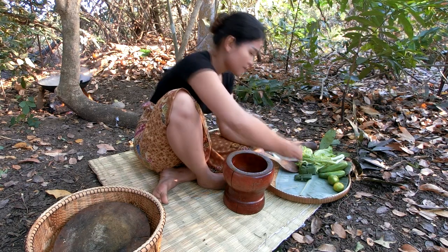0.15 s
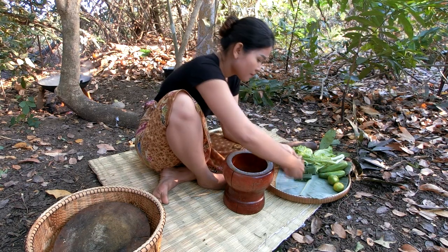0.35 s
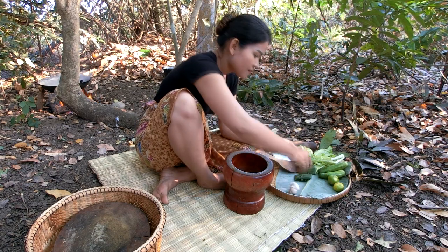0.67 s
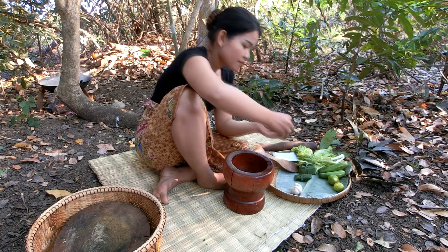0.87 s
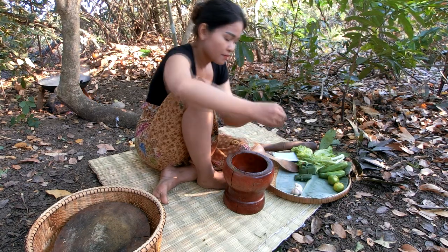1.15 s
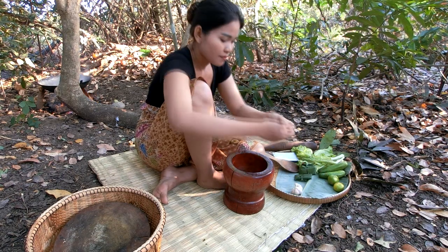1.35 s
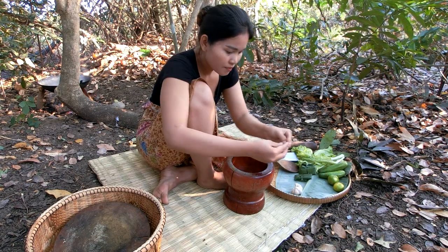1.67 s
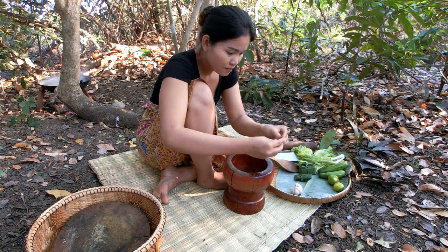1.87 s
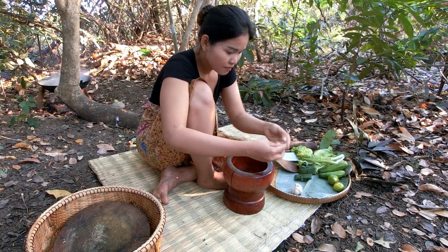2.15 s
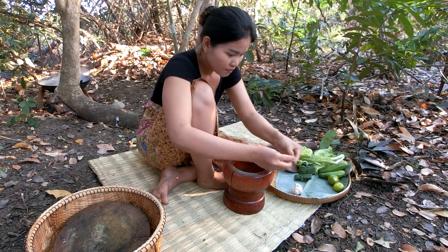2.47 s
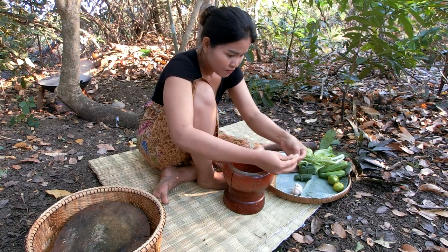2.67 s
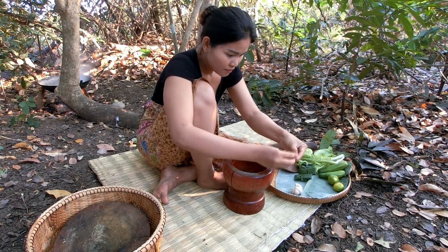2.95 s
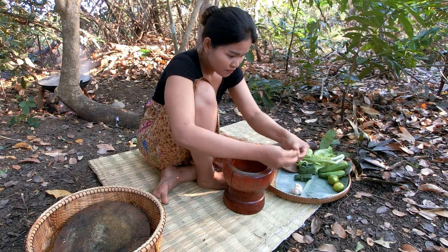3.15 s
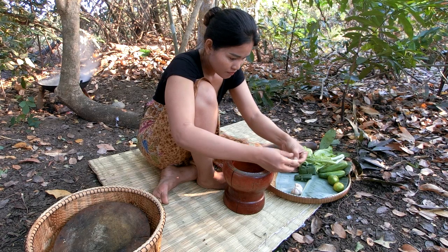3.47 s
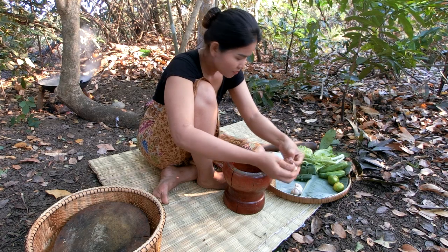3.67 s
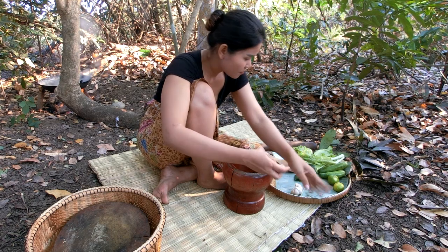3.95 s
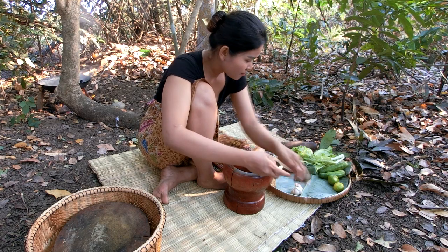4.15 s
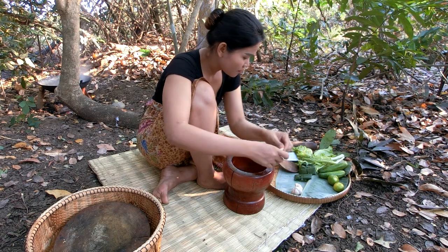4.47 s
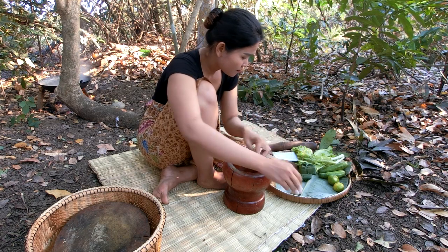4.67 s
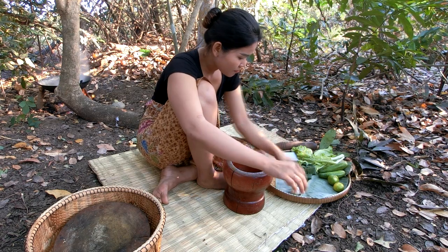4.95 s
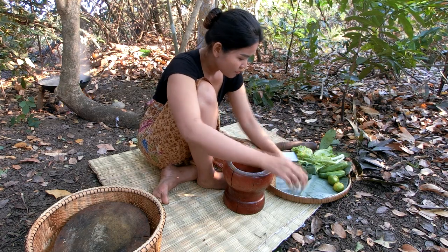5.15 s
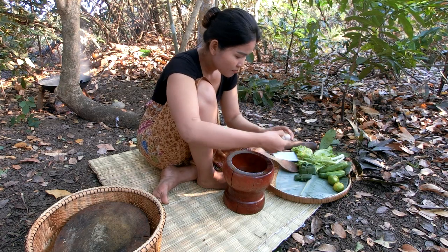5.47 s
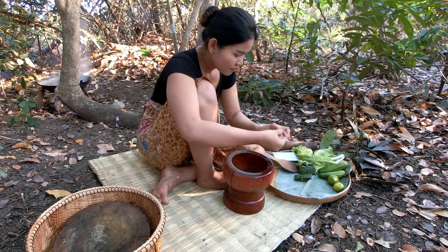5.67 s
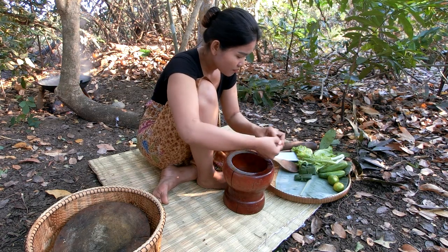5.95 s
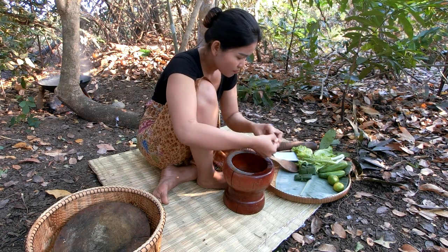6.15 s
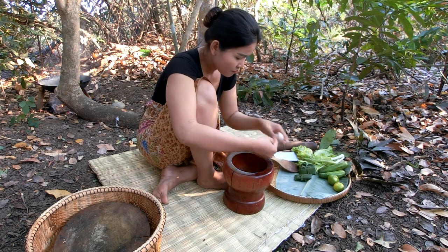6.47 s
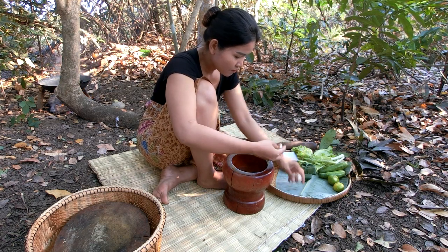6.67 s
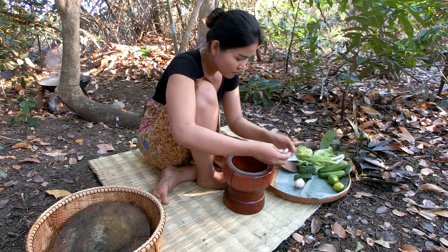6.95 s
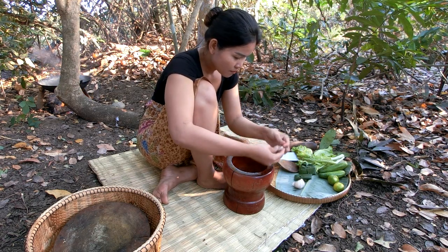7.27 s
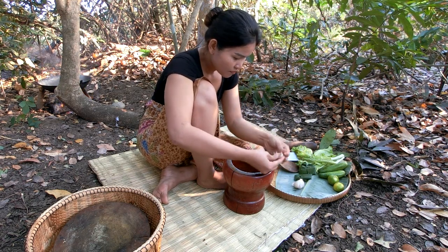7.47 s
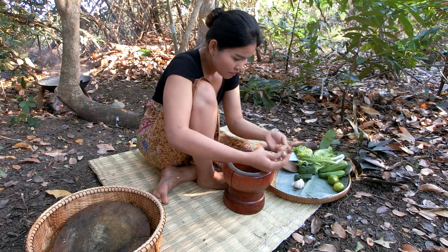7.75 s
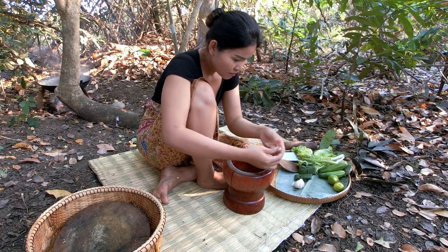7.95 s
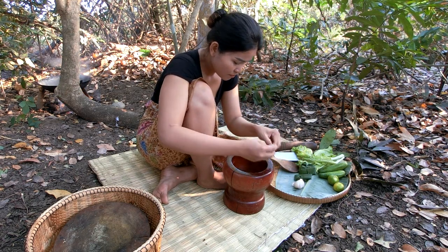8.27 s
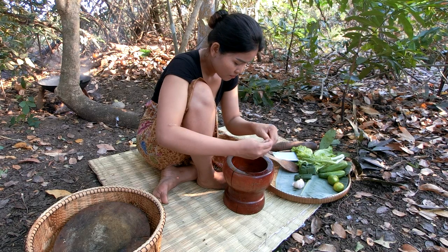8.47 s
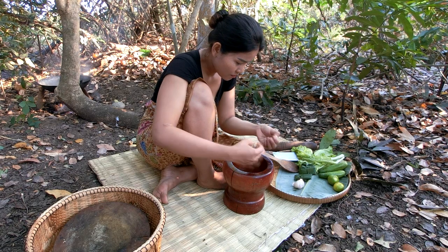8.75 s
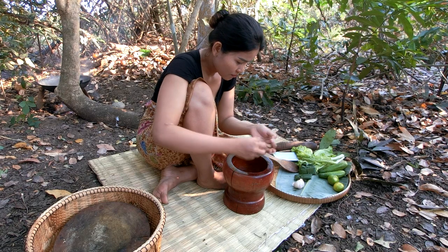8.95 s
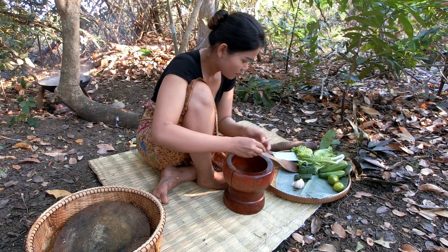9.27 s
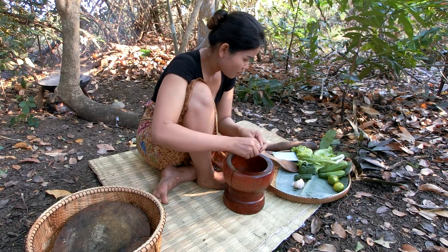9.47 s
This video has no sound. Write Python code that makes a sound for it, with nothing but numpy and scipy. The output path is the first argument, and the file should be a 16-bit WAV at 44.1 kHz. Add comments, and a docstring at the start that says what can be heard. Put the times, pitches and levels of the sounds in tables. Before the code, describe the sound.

A bird whistles falling slurs in bouts at the start, from the middle, and near the end, with quick high triple chips filling between and overlapping. Close up, dry garlic skin snaps and tears in small flurries, the strongest just after six seconds, with a light knife tap early and a few dull clove knocks. Faint far calls, buzzy insects and soft air surround it, with short leafy woodland echoes.

```python
"""Peeling garlic in a dry forest

Close to the microphones, hands peel garlic over a tray: noise bursts snap, grainy runs tear, damped modes of
cloves knock and a knife set down taps. One bird repeats a falling whistle and two more chip in quick threes, all
gliding near-pure tones. Fainter glides call from far off; insects hiss in a narrow noise band. Short rough bursts
near and above 5 kHz, grains ringing one resonance, are a far bird's blurred chips and insect buzzes.
Trunks and dry leaves scatter the sounds back as decaying noise, over a faint rush of air."""
import sys
import numpy as np
from scipy import signal
from scipy.fft import rfft, irfft, next_fast_len
from scipy.io import wavfile
from scipy.ndimage import uniform_filter1d

SR = 44100
rng = np.random.default_rng(int(sys.argv[2]) if len(sys.argv) > 2 else 0)


def persist_wave(psi):
    """Save psi, clipped to +-1, as 16-bit WAV."""
    counts = np.round(np.clip(psi, -1, 1) * 32767).astype(np.int16)
    wavfile.write(sys.argv[1], SR, np.atleast_2d(counts).T)


N = 423801
TIME = np.arange(N) / SR  # seconds

# Colour of dry garlic skin. Each row: frequency in Hz, level in dB.
SKIN_COLOUR = [(300, -25), (1500, -18.5), (3000, -16), (5000, -5.5), (7500, -0.5), (10000, 0), (13000, 0.5),
               (16000, -4.5)]


def undb(db):
    """Decibels to gain."""
    return 10 ** (np.asarray(db) / 20)


def unit(x):
    """Scale to rms 1."""
    return x / np.sqrt(np.mean(x ** 2))


def on_bins(points, size):
    """Read (Hz, value) points at the bins of a transform, along a log frequency axis."""
    hz, value = np.transpose(points)
    bins_hz = np.fft.rfftfreq(size, 1 / SR)
    return np.interp(np.log(bins_hz + 1), np.log(hz), value)


def colour(x, points, size=1024):
    """Causal minimum-phase filter of the given spectrum that keeps the power of white noise."""
    cepstrum = irfft(np.log(undb(on_bins(points, size))))
    # folding the cepstrum onto positive time gives minimum phase
    cepstrum[1:size // 2] *= 2
    cepstrum[size // 2 + 1:] = 0
    response = irfft(np.exp(rfft(cepstrum)))
    response /= np.linalg.norm(response)
    return signal.oaconvolve(x, np.atleast_2d(response))[:, :N]


def walk(rate):
    """Slow random drift of rms 1, from about `rate` fresh values a second, smoothed twice."""
    k = int(SR / rate)
    steps = np.repeat(rng.standard_normal(N // k + 1), k)
    smooth = uniform_filter1d(uniform_filter1d(steps, k), k)
    return unit(smooth[:N])


def add(track, s, sound):
    """Mix a sound into a track from time s."""
    start = max(int(s * SR), 0)
    track[..., start:start + sound.shape[-1]] += sound[..., :N - start]


def beat(start, period, count):
    """Times of an evenly repeated sound."""
    return start + period * np.arange(round(count))


def place(x, left_db, lag_us):
    """A source to the left is louder in the left microphone and reaches the right one later."""
    size = next_fast_len(N)
    delay = np.exp(-2j * np.pi * np.fft.rfftfreq(size, 1 / SR) * lag_us / 10 ** 6)
    late = irfft(rfft(x[-1], size) * delay, size)[:N]
    return np.array([x[0] * undb(left_db / 2), late * undb(-left_db / 2)])


def scatter(x, t60, build_s, left_db):
    """Countless small echoes from leaves and trunks, different at each microphone."""
    t = TIME[:SR]
    decay = undb(-60 * t / t60)
    build = 1 - np.exp(-t / build_s)
    echoes = rng.standard_normal((2, SR)) * decay * build
    echoes /= np.linalg.norm(echoes, axis=1, keepdims=True)
    return signal.oaconvolve(x, echoes, axes=1)[:, :N] * undb([[left_db / 2], [-left_db / 2]])


def note(shape, waver):
    """A bird's near-pure tone along (s, Hz, rms dB) points, its pitch trembling slightly."""
    s, hz, db = shape
    t = np.arange(s[0], s[-1], 1 / SR)
    tremble = unit(uniform_filter1d(rng.standard_normal(len(t)), size=90))
    pitch = np.interp(t, s, hz) * (1 + waver * tremble)
    phase = 2 * np.pi * np.cumsum(pitch) / SR
    return np.sqrt(2) * undb(np.interp(t, s, db)) * np.sin(phase)


def air():
    """Distant rush of the forest: gently swelling noise, more alike at both microphones in the bass."""
    # Colour of the rush. Each row: frequency in Hz, level in dB.
    air_colour = [(15, -21), (25, 4.5), (49, -5), (97, -3.5), (149, -8), (545, -7), (1330, -11), (1560, -8),
                  (2610, -13), (3720, -12.5), (4740, -16), (5880, -15.5), (9320, -13), (14400, -14),
                  (16000, -23)]
    # How alike the two microphones hear it. Each row: frequency in Hz, left-right correlation from 0 to 1.
    air_likeness = [(30, 0.11), (80, 0.74), (250, 0.384), (1000, 0.27), (3000, 0.19), (12000, 0.011)]
    size = next_fast_len(N)
    mid, side = rfft(rng.standard_normal((2, size)))
    likeness = np.clip(on_bins(air_likeness, size), 0, 1)
    opposite = np.array([[1], [-1]])
    pair = mid * np.sqrt(1 + likeness) + opposite * side * np.sqrt(1 - likeness)
    rush = unit(irfft(pair * undb(on_bins(air_colour, size)), size)[:, :N])
    level_db = -59 + 0.5 * walk(2.072)
    return place(rush * undb(level_db), left_db=0.3, lag_us=0)


def insects():
    """Many small singers share one narrow resonance: noises throb out of step in a single band."""
    # Level of the chorus over time. Each row: time in seconds, level in dB before chorus_trim_db.
    chorus_levels = [(0.0, -53), (0.96, -69.5), (1.79, -65.5), (2.27, -65.5), (2.67, -60.5), (4.33, -62),
                     (4.44, -64.5), (5.8, -63), (5.99, -58), (6.52, -65), (7.0, -61), (7.86, -64),
                     (8.26, -59.5), (9.6, -64)]
    # The shared resonance. Each row: frequency in Hz, level in dB.
    insect_band = [(3000, -30.5), (3900, -17), (4350, -2), (4750, 0.5), (5150, -6.5), (5700, -19),
                   (7000, -52)]
    chorus_trim_db = 0.5
    shared, left, right = (rng.standard_normal(N) * undb(3.8 * walk(80)) for _ in range(3))
    chorus = unit(colour(0.75 * shared + np.array([left, right]), insect_band))
    level_db = chorus_trim_db + np.interp(TIME, *np.transpose(chorus_levels))
    return place(chorus * undb(level_db), left_db=2, lag_us=43)


def rough_bursts():
    """A far bird's blurred chips at an even beat, and insect buzzes: random grains ring one resonance."""
    # Short rough bursts near and above 5 kHz. Each row: start in seconds, number of bursts,
    # seconds from burst to burst, resonance in Hz, rms level in dB before the mix of direct sound and echo.
    burst_groups = [(0.484, 2, 0.3, 4945, -59), (0.495, 2, 0.14, 6050, -61.5),
                    (1.127, 6, 0.198, 5140, -54.5), (4.181, 1, 0.081, 6100, -55.5),
                    (4.674, 4, 0.11, 6780, -59), (5.589, 4, .109, 6800, -61), (6.722, 1, 0.086, 6440, -56),
                    (8.349, 1, .13, 5900, -59)]
    duty, grains_per_s = 0.62, 900  # duty: share of each beat that sounds
    song, t = np.zeros((1, N)), TIME[:SR // 100]
    for start, bursts, period, hz, db in burst_groups:
        n = int(duty * period * SR)
        ring = t * np.exp(-t / 0.00037) * np.sin(2 * np.pi * hz * t)
        for s in beat(start, period, count=bursts):
            grains = (rng.random(n) < grains_per_s / SR) * rng.standard_normal(n)
            burst = np.convolve(grains, ring)[:n] * signal.windows.tukey(n, .6)
            add(song, s, unit(burst) * undb(db))
    direct = undb(-12.5) * place(song, left_db=8, lag_us=19)
    return direct + undb(-5) * scatter(song, t60=0.197, build_s=0.001, left_db=3.0)


def far_birds():
    """Faint glides from deep in the trees, swelling and fading, with echo nearly as strong as the call."""
    # The clearer calls. Each row: start in seconds, length in seconds, first pitch in Hz, last pitch in Hz,
    # mid-call level in dB before the mix of direct sound and echo.
    calls = list([(0.951, .06, 2790, 3050, -64), (1.383, .17, 3480, 4060, -63),
                  (2.116, 0.1086, 4150, 3258, -62.5), (2.19, .13, 2820, 2320, -66.5),
                  (2.549, .12, 2960, 2690, -66), (2.911, .11, 1446, 1280, -64),
                  (3.077, 0.21, 1147, 980, -67.5), (3.586, .17, 1016, 951, -67.5),
                  (4.049, 0.13, 4120, 4600, -61), (4.96, 0.085, 2340, 2057, -64.5),
                  (5.356, 0.112, 3260, 3140, -62.5), (6.14, 0.088, 3420, 3680, -57),
                  (6.485, .12, 4030, 3020, -60), (6.834, 0.084, 3320, 3290, -59),
                  (8.333, 0.11, 3455, 3550, -66), (9.167, .08, 3870, 3180, -63.5),
                  (9.468, 0.11, 4378, 3480, -69)])
    # the faintest are short downward slurs, one at a random moment in each gap
    gap_s, length_s, centre_hz, fall_ratio, faint_db = .9, 0.079, 2710, 0.92, -67
    beats = np.arange(0, TIME[-1] - gap_s, gap_s)
    for s, (late, high) in zip(beats, rng.random((len(beats), 2))):
        first_hz = centre_hz * (1 + .15 * high)
        calls.append((s + late * gap_s, length_s, first_hz, first_hz * fall_ratio, faint_db))

    song = np.zeros((1, N))
    u = np.linspace(0, 1, 9)
    fade_db = -16 * np.abs(2 * u - 1) ** 3
    for s, length, first_hz, last_hz, db in calls:
        glide = first_hz + (last_hz - first_hz) * u ** 2.1  # starts level and steepens
        add(song, s, note((u * length, glide, db + fade_db), waver=0.0137))
    direct = undb(-2.0) * place(song, left_db=3.0, lag_us=11)
    return direct + undb(-3.5) * scatter(song, t60=0.38, build_s=.003, left_db=0.5)


def chipper():
    """Two birds' short falling chips at an even beat, blurred by the foliage and washed by the trees."""
    # Bouts of chip runs, the low weak ones from a second bird. Each row: first chip in seconds, number of runs,
    # seconds from run to run, pitch ratio, level in dB before spread and mix.
    chip_bouts = [(.380, 1, .225, 1.01, -45.5), (2.443, 6, .2243, .985, -46), (2.56, 7, .2243, .91, -53),
                  (3.752, 2, .224, 1.005, -44), (4.172, 4, .231, 1.01, -46), (6.72, 4, .2248, .92, -53),
                  (6.833, 6, .2248, 1, -46), (8.117, 4, .234, 1, -46.5)]
    # Shape of one chip. Each row: seconds from its centre, pitch in Hz before ratio and spread,
    # relative level in dB.
    chip_shape = [(-.009, 5560, -21), (-.004, 5266, -7), (0, 5120, -3), (.005, 4876, -2.5),
                  (.011, 4625, -8.5), (0.018, 4357, -13)]
    chip_beat_s, run_pitch_spread, chip_pitch_spread, chip_spread_db = .0368, .012, 0.0088, 0.76
    song = np.zeros((1, N))
    dt, hz, shape_db = np.transpose(chip_shape)
    for start, runs, period, ratio, db in chip_bouts:
        for run_s in beat(start, period, count=runs):
            run_pitch = ratio * (1 + run_pitch_spread * rng.standard_normal())
            for s in beat(run_s, chip_beat_s, count=3):
                wobble, effort = rng.standard_normal(2)
                pitch = hz * run_pitch * (1 + chip_pitch_spread * wobble)
                levels = shape_db + db + chip_spread_db * effort
                add(song, s + dt[0], note((dt, pitch, levels), waver=0.015))
    leaves = undb(-5.5) * scatter(song, t60=0.12, build_s=0.0029, left_db=-1.5)
    # the long way through the trees dulls the top of each chip
    dull = signal.lfilter(*signal.butter(4, 4900, "low", fs=SR), song)
    trees = undb(-0.5) * scatter(dull, t60=0.226, build_s=0.0033, left_db=6.5)
    return undb(-1.5) * place(song, left_db=3.0, lag_us=22) + leaves + trees


def whistler():
    """A slur that holds high, falls fast and levels out; its weight shifts between start and end."""
    # Falling whistles. Each row: time of the bend in seconds, level in dB before the shape, time stretch.
    whistles = [(.048, -44, 0.87), (0.438, -43, 0.91), (.847, -44, 0.9), (1.239, -44.5, 1.06),
                (1.682, -44, 0.96), (3.607, -43, 1.11), (3.985, -40.5, 0.86), (4.342, -42.5, 0.95),
                (4.711, -39.5, 0.98), (5.121, -41, 1.1), (5.495, -41.5, 1.02), (5.895, -37.5, 1.03),
                (7.759, -39, 0.87), (8.135, -37.5, 0.88), (8.484, -39.5, 0.86), (8.92, -42.5, 0.83),
                (9.286, -42.5, .85)]
    # Shape of one slur. Each row: seconds from the bend before stretching, pitch in Hz before a small
    # random bend, relative level in dB before the weighting.
    slur_shape = [(-.054, 4340, -29), (-.044, 4460, -14), (-.036, 4540, -10), (-.023, 4420, -12.5),
                  (-.017, 4140, -5.5), (-.011, 3736, -4.5), (-.001, 3250, -4.5), (.011, 2986, -3.5),
                  (.027, 2900, -5), (.039, 2850, -6), (0.047, 2535, -12.5), (.052, 2200, -22)]
    # a louder whistle leans more on its low end
    low_end_db, usual_db, low_end_per_db = -1.5, -40.5, 0.79
    song = np.zeros((1, N))
    dt, hz, shape_db = np.transpose(slur_shape)
    for s, db, stretch in whistles:
        weight_db = low_end_db + low_end_per_db * (db - usual_db)
        levels = db + shape_db + weight_db * np.clip(dt / 0.02, -1.2, 1)
        pitch = hz * (1 + 0.0046 * rng.standard_normal(len(hz)))  # no two slurs bend quite alike
        add(song, s + dt[0] * stretch, note((dt * stretch, pitch, levels), waver=.006))
    # foliage throws back the high start more than the low end
    bright = signal.lfilter(*signal.butter(2, 3650, "high", fs=SR), song)
    leaves = undb(2.5) * scatter(bright, t60=0.2, build_s=0.00066, left_db=2.5)
    trees = undb(-19) * scatter(song, t60=0.56, build_s=0.016, left_db=-4.0)
    return place(song, left_db=2.8, lag_us=18) + leaves + trees


def tray():
    """Cloves knock dully on the tray and a knife set down taps it: well-damped modes, alike in both microphones."""
    # Dull clove knocks, then light knife taps. Each row: time in seconds, level in dB before the modes.
    knocks, taps = [(4.815, -35.5), (6.338, -46), (7.405, -38.5)], [(.187, -46), (.209, -36), (.219, -31.5)]
    # What each rings with. Each row: frequency in Hz, time to fall 60 dB in seconds, relative level in dB.
    knock_modes, tap_modes = [(194.5, 0.022, -24), (574, 0.018, -17), (667, 0.019, 0), (1150, .0075, -16)], [(2270, 0.012, -2.5), (2370, 0.0333, 0)]
    hits, t = np.zeros((2, N)), TIME[:SR // 10]
    onset = 1 - np.exp(-t / 0.00048)
    for blows, modes in (knocks, knock_modes), (taps, tap_modes):
        ring = np.zeros(len(t))
        for hz, t60, db in modes:
            ring += undb(db) * np.exp(-np.log(1000) * t / t60) * np.sin(2 * np.pi * hz * t)
        for s, db in blows:
            add(hits, s, undb(db) * ring * onset)
    return hits


def fingertips():
    """Faint stray crackles as the fingers work the husk: decaying noise grains in small flurries."""
    chance = 14 * undb(3.4 * walk(3.5)) / SR  # around 14 grains a second
    sizes = undb(3.7 * np.minimum(rng.exponential(size=N), 3)) * rng.choice([-1, 1], N)
    strikes = (rng.random(N) < chance) * sizes
    t = TIME[:SR // 200]
    grain = rng.standard_normal((2, len(t))) * np.exp(-t / 0.00053)
    crackles = signal.oaconvolve([strikes], grain, axes=1)[:, :N]
    ticks = colour(crackles, SKIN_COLOUR) * undb(-56)
    return place(ticks, left_db=6.0, lag_us=24) + scatter(ticks, t60=0.056, build_s=0.0009, left_db=9)


def peeling():
    """Each snap is a brief burst of fracture noise; a tear is a run of tiny uneven fractures."""
    # Skin snaps. Each row: start in seconds, level in dB before a common 5 dB cut,
    # low body in dB relative to the snap before a common 6 dB cut.
    snaps = [(.114, -27.5, -21), (.187, -27, -26.5), (0.194, -33, -13), (.220, -24, -11),
             (1.218, -34.5, -23), (1.304, -35.5, -11), (1.360, -34, -18), (1.766, -22, -9.5),
             (1.868, -21.5, -15.5), (1.917, -25, -13), (2.054, -35.5, -3), (2.508, -36.5, -18.5),
             (3.174, -22.5, -11), (3.265, -20.5, -15), (3.338, -34, -8), (3.493, -35.5, -12),
             (3.567, -33, -15.5), (3.593, -28.5, -3.5), (4.354, -29, -22), (4.397, -21, -22),
             (5.963, -35.5, -15), (6.033, -38.5, -2), (6.163, -32.5, -5.5), (6.216, -37, -3.5),
             (6.285, -21.5, -22), (6.292, -13, -7.5), (7.298, -37.5, -12), (7.405, -19.5, -1.5),
             (7.423, -30, -18), (7.551, -23.5, -32.5), (8.473, -38, -8.5), (8.534, -26.5, -2.5),
             (8.569, -30.5, -4), (8.644, -30, -4.5), (8.943, -33, 2), (9.222, -31.5, -26),
             (9.239, -34, -20)]
    # Tears and rustles. Each row: start in seconds, length in seconds, rms level in dB before colouring,
    # mid-range body in dB relative to that level.
    tears = [(0.084, 0.1, -46.5, -13), (0.179, 0.0467, -37, 1.5), (0.301, 0.055, -50, -14),
             (1.213, 0.046, -45.5, -9), (1.278, 0.082, -58.5, 2.5), (1.868, 0.13, -51.5, -26),
             (2.502, 0.064, -53, -6), (3.556, 0.067, -37, -17), (3.591, .03, -35.5, -19),
             (3.623, 0.065, -48, -12), (4.36, 0.0818, -44.5, -22), (6.267, 0.017, -38, -6),
             (6.291, 0.0591, -40, -10.5), (7.534, 0.04, -43.5, -34.5), (8.56, 0.073, -41, -15),
             (8.896, 0.055, -52, -1), (9.397, 0.061, -55, -7.5)]
    # Colours of the low body and of a rough tear. Each row: frequency in Hz, level in dB.
    body_colour, tear_colour = [(40, -14), (120, 1.5), (300, -4.5), (700, -2), (1400, -6), (2600, -3.5),
                                (4500, 3), (8000, -23.5), (16000, -2)], [(200, -26), (1500, -22), (2250, -0.5), (3500, 6), (5000, 5),
                                              (8000, 7), (16000, -36.5)]
    crack_ms, fractures_per_s = 1.332, 1500
    skin, body, rough = np.zeros((3, 2, N))
    t = TIME[:SR // 20]
    age = t / (crack_ms / 10 ** 3)
    # the skin gives way at once, then its loose edges quiver on
    force = np.exp(-age ** 2 / 2) + 0.43 * np.exp(-age / 4)
    for s, db, body_db in snaps:
        shared, left, right = rng.standard_normal((3, len(t)))
        crack = (shared + 0.571 * np.array([left, right])) * force * undb(db - 5.0)
        add(skin, s, crack)
        add(body, s, crack * undb(body_db))
    for s, length, db, body_db in tears:
        n = int(length * SR)
        sizes = undb(3.3 * np.minimum(rng.exponential(size=n), 3.5))
        fractures = (rng.random(n) < fractures_per_s / SR) * sizes * rng.choice([-1, 1], n)
        grain = rng.standard_normal((2, len(t))) * np.exp(-t / 0.00031)
        crackle = signal.fftconvolve([fractures], grain, axes=1)[:, :n]
        crackle = unit(crackle * signal.windows.tukey(n, .5)) * undb(db)
        add(skin, s, crackle)
        add(rough, s, crackle * undb(body_db))
    near = colour(skin, SKIN_COLOUR) + undb(-6.0) * colour(body, body_colour) + colour(rough, tear_colour)
    echo = undb(-3.0) * scatter(near, t60=0.15, build_s=0.00038, left_db=2.0)
    return place(near, left_db=2.0, lag_us=22.7) + echo


def scene():
    """Hands close by, with birds, insects and the rush of air behind them."""
    background = air() + insects() + rough_bursts()
    birds = far_birds() + chipper() + whistler()
    hands = tray() + fingertips() + peeling()
    return background + birds + hands


def record(dry):
    """The recorder cuts the top with a steep low-pass."""
    top_hz = 15900
    low_pass = signal.ellip(8, .2, 70, top_hz, fs=SR, output="sos")
    return signal.sosfilt(low_pass, dry)


dry = scene()
out = record(dry)
persist_wave(out)
```